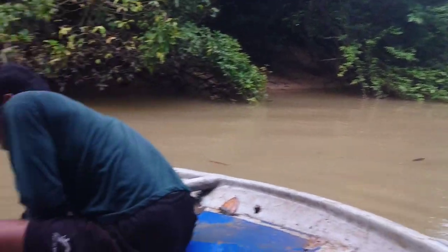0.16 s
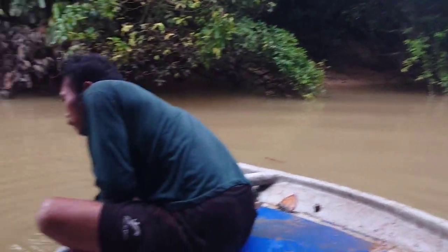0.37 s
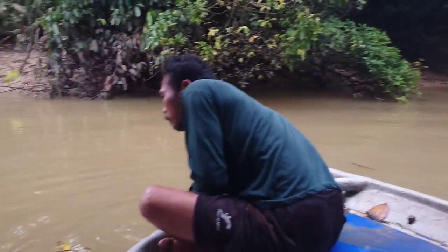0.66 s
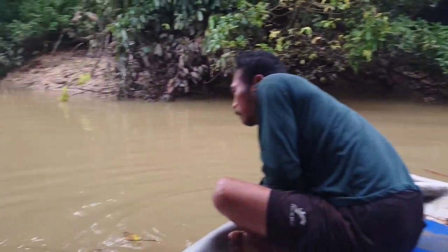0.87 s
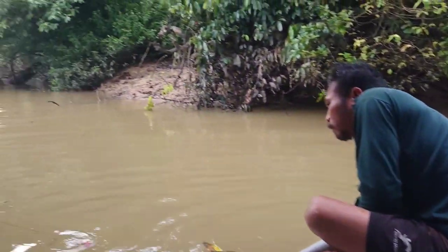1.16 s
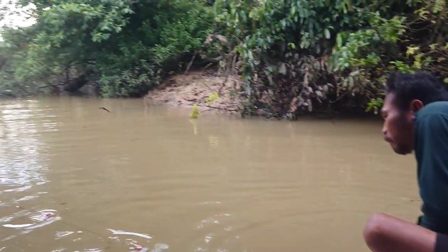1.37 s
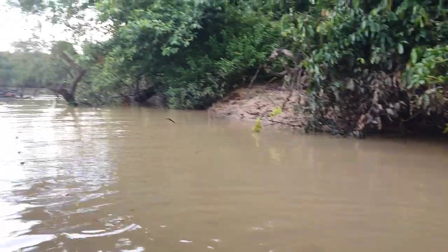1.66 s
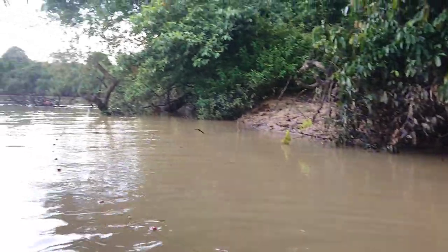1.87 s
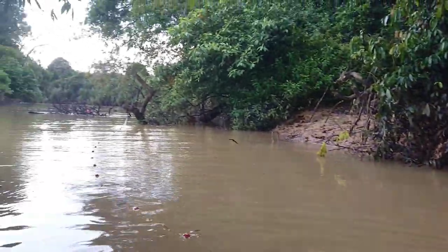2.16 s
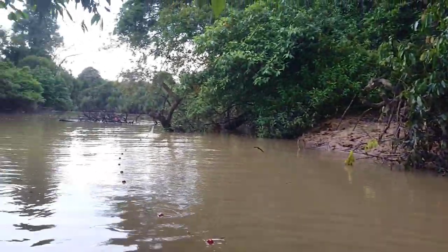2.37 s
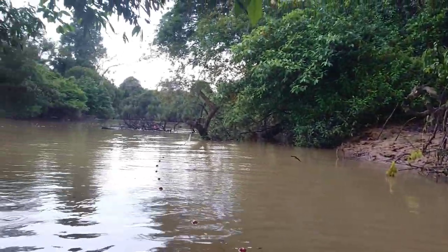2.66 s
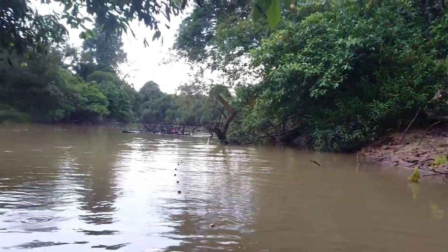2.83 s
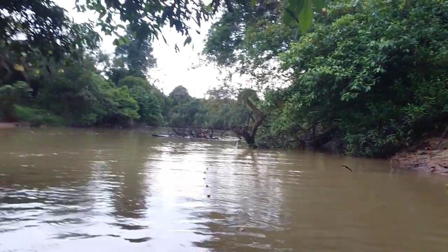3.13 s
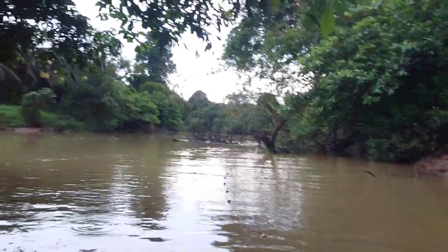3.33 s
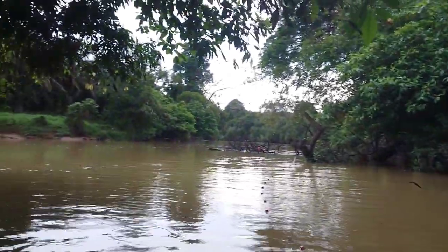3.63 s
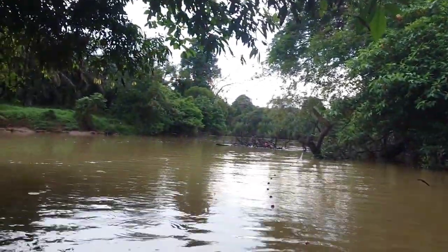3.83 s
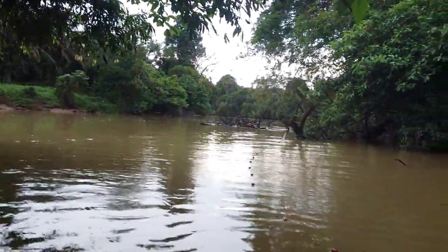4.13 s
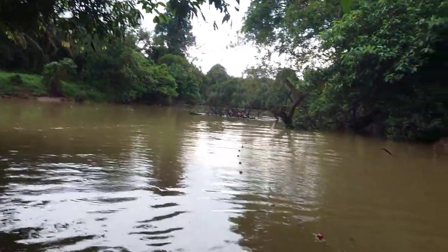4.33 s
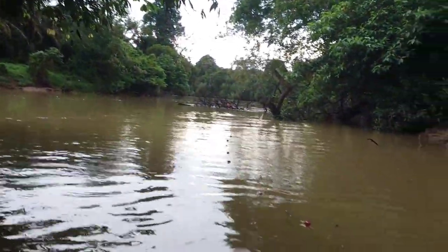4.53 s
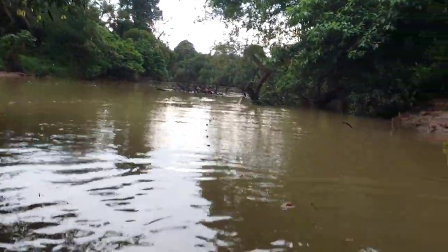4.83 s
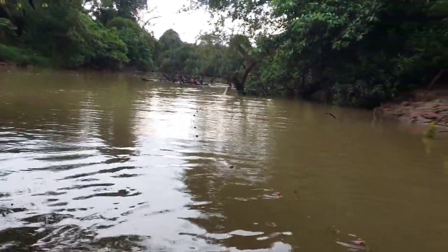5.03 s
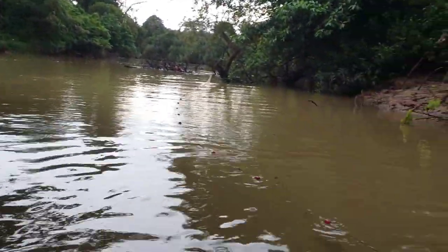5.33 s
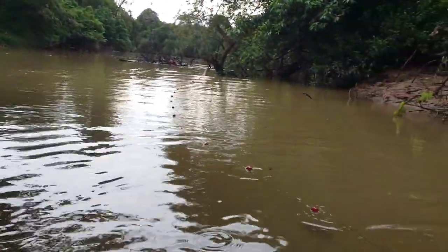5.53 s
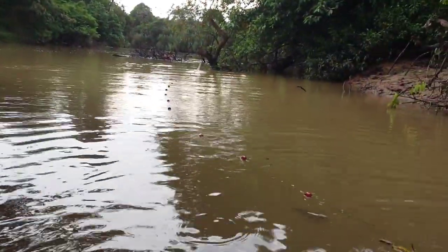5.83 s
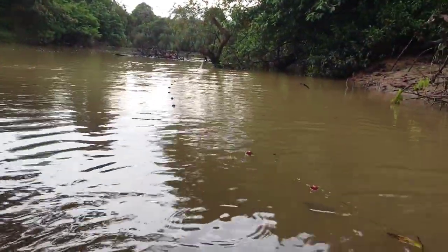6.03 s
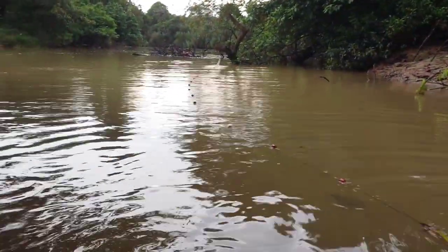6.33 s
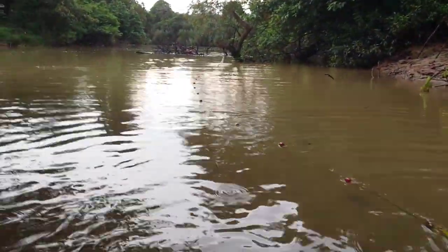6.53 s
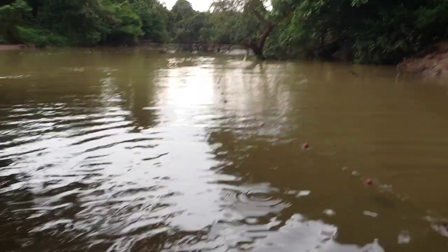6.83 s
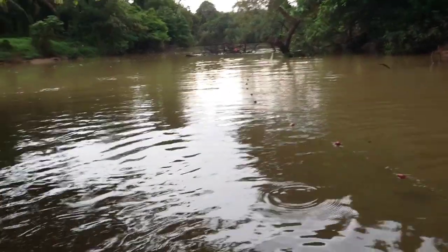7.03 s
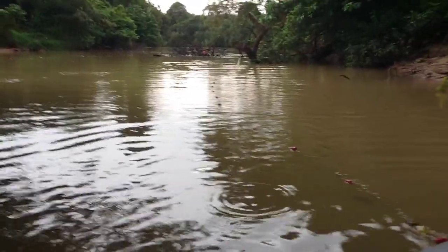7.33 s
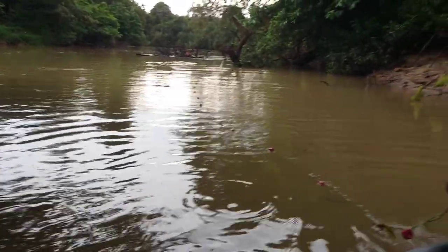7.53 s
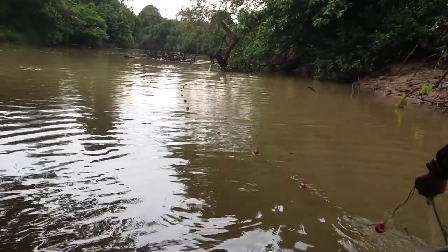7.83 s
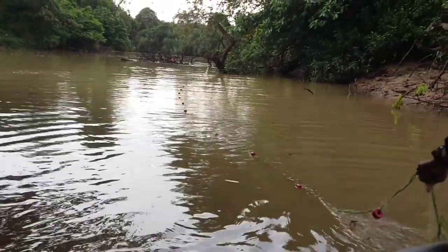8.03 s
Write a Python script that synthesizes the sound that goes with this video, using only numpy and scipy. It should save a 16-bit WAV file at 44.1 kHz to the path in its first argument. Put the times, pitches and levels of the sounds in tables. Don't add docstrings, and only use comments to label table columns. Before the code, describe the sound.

Outdoors on a calm river, heard very close from inside a small metal boat. A quiet bed of low air and water rumble, lapping, soft hiss and thin, high, pulsing insect song runs throughout. At 0 s a short scrape and tap; at 0.8 a dull, hollow hull thud with a drag, then small bumps. From 1.5 to 4.2 drops plink and bubble, with a double clack at 2.1 and a sharp, ringing knock at 3.2. A softer thump comes at 4.3, a pair of bright knocks with a cord snap at 5.3, and low bumps from 5.6 to 6.1. Light taps continue as rubbing grows from 6.6. At 7.1-7.3 the loudest event: clustered clacks, scrapes and a deep booming thump, heaviest at 7.2. Afterwards fine drips, a bubbling note near 8, low bumps and strengthening wet cord rasp until about 8.2.

```python
import sys
import numpy as np
from scipy import signal
from scipy.io import wavfile

SR = 44100
rng = np.random.default_rng(int(sys.argv[2]) if len(sys.argv) > 2 else 0)


def natural_amplitude(level_db):
    exponent = np.asarray(level_db, float) / 20
    return 10 ** exponent


def materialize(psi):
    bounded = np.clip(np.atleast_2d(psi).T, -1, 1)
    quanta = np.round(bounded * 32767).astype(np.int16)
    wavfile.write(sys.argv[1], SR, quanta)


N = 361399

PORT_LAG, HULL_LAG, RIM_LAG = 16, 8, 13


def rms_one(x):
    return x / np.sqrt(np.mean(x ** 2) + 1e-20)


def at_hz(points, hz):
    table_hz, value = np.transpose(points)
    return np.interp(np.log(hz), np.log(table_hz), value)


def drift(rate_hz):
    r = np.exp(-80 * np.pi * rate_hz / SR)
    slow = signal.lfilter([1], [1, -2 * r, r * r], rng.standard_normal(N // 40 + 2002))
    slow = rms_one(slow[2000:])
    return np.interp(np.arange(N) / 40, np.arange(len(slow)), slow).astype(np.float32)


def band_pass(noise, low_hz, high_hz):
    return signal.sosfilt(signal.butter(2, [low_hz, high_hz], "band", fs=SR, output="sos"), noise)


def add(out, sound, s, pan_db, left_lag=PORT_LAG):
    for ch, lag in enumerate((left_lag, 0)):
        at = max(round(s * SR) + lag - left_lag // 2, 0)
        part = sound[ch, :N - at]
        out[ch, at:at + len(part)] += part * natural_amplitude(pan_db / 2 * (1.5 - 2 * ch))


# f/Hz, width/Hz, level/dB, pulses/s, throb/dB
CHOIRS = [
    (6248, 340, -68, 160, -2.2),
    (6695, 240, -65, 82, 2.4),
    (8430, 300, -70, 176, -0.5),
    (8795, 380, -67, 99, 0),
    (9100, 320, -73, 210, 1),
    (12900, 1000, -72, 1000, .7),
    (14900, 2400, -65.5, 900, .7),
]


def insects():
    out, t = 0, np.arange(N) / SR
    for hz, width_hz, db, per_s, throb_db in CHOIRS:
        chirps = rng.random((2, N)) < 3.5 * per_s / SR
        pulses = rng.standard_normal((2, N)) * (0.64 + 3.4 * chirps)
        r = np.exp(-np.pi * width_hz / SR)
        poles = [1, -2 * r * np.cos(2 * np.pi * hz / SR), r * r]
        once = signal.lfilter([1, 0, -1], poles, pulses)
        song = rms_one(signal.lfilter([1, 0, -1], poles, once))
        near_singers = (-.45, .05, .4) if width_hz < 700 else ()
        for offset in near_singers:
            wing = 1 + 0.25 * np.sin(2 * np.pi * per_s * (t + 0.0034 * drift(3.3)))
            pitch_hz = hz + offset * width_hz + 14 * drift(5)
            cycles = np.cumsum(pitch_hz, dtype=float) / SR
            note = np.sin(2 * np.pi * cycles + [[0], [np.pi / 2]])
            song = song + natural_amplitude(-6 + 2.3 * drift(3.9)) * wing * note
        out = out + natural_amplitude(db + throb_db * drift(1.33)) * song
    return out


# f/Hz, likeness/0-1
LIKENESS = [(40, 0.46), (150, 0.96), (400, 0.84), (1000, 0.072), (2500, 0.16), (5000, 0.012)]


def banded_noise(spectrum, patchy_db, flicker_hz):
    low_hz, top_hz = spectrum[0][0], min(spectrum[-1][0], .45 * SR)
    edges = np.geomspace(low_hz, top_hz, int(2 * np.log2(top_hz / low_hz)) + 2)
    out, together = 0, drift(flicker_hz / 4)
    white = rng.standard_normal((2, 2, N))
    for k, (low, high) in enumerate(zip(edges, edges[1:])):
        mid, side = band_pass(white[k % 2], low, high)
        hz = np.sqrt(low * high)
        alike = np.clip(at_hz(LIKENESS, hz), 0, 1)
        flicker = natural_amplitude(patchy_db * (0.66 * together + drift(flicker_hz)))
        stereo = np.sqrt(1 + alike) * mid + np.sqrt(1 - alike) * side * [[1], [-1]]
        out = out + natural_amplitude(at_hz(spectrum, hz)) * flicker * stereo
    out[0] = np.roll(out[0], PORT_LAG)
    return rms_one(out * natural_amplitude([[-1.1], [1.1]]))


# t/s, level/dB
PULL = [(0, -70.5), (.42, -70.5), (.53, -64.5), (1.0, -65), (1.15, -69), (1.55, -71.5), (3.0, -72),
        (4.25, -73.5), (5.15, -63.5), (5.7, -71.5), (6.55, -64.5), (6.75, -57.5), (7.07, -58),
        (7.32, -51.5), (7.45, -63), (7.81, -59.5), (7.87, -53), (8.19, -49.5)]


def pull():
    return np.interp(np.arange(N) / SR, *np.transpose(PULL))


def stirred(calm_db, middling_db, follows, after_db, rise_s, dying_s):
    swell = np.full(N, 1e-18)
    for s, db, *_ in THUDS:
        swell[round(s * SR)] = natural_amplitude(db + after_db)
    rise = np.exp(-1 / (SR * max(rise_s, .002)))
    fall = np.exp(-1 / (SR * max(dying_s, .01)))
    swell = signal.lfilter([1 - rise], np.convolve([1, -rise], [1, -fall]), swell)
    return natural_amplitude(calm_db) + natural_amplitude(middling_db + follows * (pull() + 60)) + swell


# f/Hz, level/dB per Hz
RUMBLE = [(15, -55), (25, -21), (36, -8), (75, 4), (94, -2.5), (119, -14), (140, -25), (200, -15),
          (260, -30.5), (440, -120)]


def rumble():
    level = stirred(calm_db=-57, middling_db=-64, follows=1, after_db=-32.5, rise_s=0.8, dying_s=0.23)
    return level * banded_noise(RUMBLE, patchy_db=0.5, flicker_hz=13)


# f/Hz, level/dB per Hz
MURMUR = [(76, -29), (130, -2.5), (492, -7.5), (549, -2), (620, -7.5), (1430, -25.5), (1800, -12.5),
          (2340, -50), (3960, -120)]


def murmur():
    level = stirred(calm_db=-72, middling_db=-60, follows=1.64, after_db=-30.5, rise_s=2.2, dying_s=0.018)
    return level * banded_noise(MURMUR, patchy_db=2.8, flicker_hz=9)


# f/Hz, level/dB per Hz
RUB = [(590, -14), (1000, -5.5), (1730, -12), (2500, -6), (3830, -7), (4810, -5.5), (6790, -10.5),
       (7880, -13), (8840, -14), (15500, -20.5)]


def rub():
    cord = natural_amplitude(5.0) * banded_noise(RUB, patchy_db=1.97, flicker_hz=55)
    spray = signal.sosfilt(signal.butter(2, 9500, "high", fs=SR, output="sos"), cord)
    level = stirred(calm_db=-90, middling_db=-60, follows=1, after_db=-37.5, rise_s=0, dying_s=0.024)
    return level * cord + 2 * natural_amplitude(pull() - 9) * spray


# f/Hz, level/dB per Hz
AIR = [(120, 5), (300, -9), (600, -17), (1200, -17), (2500, -21), (4500, -22.5), (6500, -13.5), (9000, -17),
       (12000, -32.5), (15500, -28)]


def air():
    return natural_amplitude(-61) * banded_noise(AIR, patchy_db=1.6, flicker_hz=8)


# f/Hz, level/dB, t60/s
HULL = [(58.5, -2, 0.35), (84, 13, 0.088), (120, 2, 0.76), (152.7, 0.5, 0.83), (195.7, -1, 0.56),
        (228.2, 4, 0.27), (251, -23, 0.29), (298, 2, 0.33), (340.7, 0, 0.35), (413, -2.5, 0.36),
        (465.3, -0.5, 0.18), (516, -2, 0.25), (564.7, -5, 0.34), (640.4, -4, 0.19), (750, -4, 0.22),
        (872, 5, 0.078), (1019, -3, 0.18), (1166, 8, 0.056), (1406, 1.5, 0.076), (1640, 0.5, 0.12),
        (1744, -4, 0.067), (1950, -11, 0.23), (2204, 4.5, 0.057), (2180, -40, 0.061), (3000, -34, 0.01),
        (2872, 0, 0.047), (3750, -33, .08), (3580, -49, 0.073), (4500, -55, .06), (5500, -20, .05)]
BLOW_S = .22


def struck_hull(centre, spread, ring, contact_s):
    hz, level_db, t60 = np.tile(np.transpose(HULL), 2)[:, :, None]
    place, turn, apart = rng.standard_normal((3, 2 * len(HULL), 1))
    t = np.arange(round(BLOW_S * SR), dtype=np.float32) / np.float32(SR)
    hz = hz * (1 + turn * np.repeat([.015, .07], len(HULL))[:, None])
    away = (np.log2(hz / 100) - centre) / max(spread, .15)
    gain = natural_amplitude(level_db - 2.8 * away ** 2 + 2 * place)
    fall = np.log(1000) / (t60 * np.clip(ring, .1, 1.5))
    twist = apart * np.clip(hz / 3500, .06, 1.5)
    heard = away[:, 0] ** 2 < 6
    parts = (gain, fall, hz, twist, place)
    gain, fall, hz, twist, place = [v[heard].astype(np.float32) for v in parts]
    build_up = 1 - np.exp(-t / (max(contact_s, 2e-4) + 0.14 / hz))
    shape = gain * np.exp(-fall * t) * build_up
    phase = 2 * np.pi * (hz * t + 0.13 * place)
    both = np.array([np.sum(shape * np.sin(phase + side * twist), 0) for side in (1, -1)])
    fade = np.minimum(1, (len(t) - np.arange(len(t))) / 2000)
    return both * fade / np.max(np.abs(both))


# t/s, level/dB, centre/octaves over 100 Hz, length/s
DRAGS = [(0.005, -40, 2.2, 0.044), (.47, -54, 4.9, 0.11), (.835, -31, 1.98, 0.047), (.875, -37, 2.0, 0.052),
         (.97, -57, 4.8, .07), (1.305, -47, 2.9, 0.067), (1.797, -50, 3.4, .008), (3.214, -37, 4, .06),
         (3.225, -40, 2.4, .09), (3.343, -54, 4.9, .02), (5.264, -38, 2.8, 0.024), (5.305, -43, 3.1, 0.058),
         (5.622, -39, 2.23, 0.046), (5.86, -48, 2.5, 0.066), (5.91, -39.5, 2.75, 0.034),
         (5.912, -44.5, 4.5, .02), (6.055, -51, 2.7, .05), (6.105, -49, 2.9, .04), (7.1, -32.5, 3.5, 0.06),
         (7.108, -38, 4.7, 0.047), (7.205, -32, 4.6, 0.058), (7.265, -32.5, 3.4, 0.065),
         (7.33, -41, 2.3, .04), (7.41, -47, 3.2, .03), (7.84, -46, 2.3, .04), (7.89, -46, 1.8, .05),
         (8.038, -41, 3, .05), (8.13, -38, 2.7, 0.057)]


def drags():
    out, t = np.zeros((2, N)), np.arange(round(.15 * SR)) / SR
    slips_per_s = 1100
    for s, db, centre, length_s in DRAGS:
        when, size = rng.random((2, len(t)))
        push = np.sin(np.pi * np.clip(t / max(length_s, .005), 0, 1) ** 0.55)
        slipping = np.tanh(np.maximum(slips_per_s / SR - when, 0) * SR / 40)
        slips = slipping * (2 * size - 1) * push
        plates = struck_hull(centre, spread=.45, ring=.36, contact_s=0.00065)
        sound = signal.fftconvolve(plates, slips[None], axes=1)
        add(out, natural_amplitude(db) * sound / (np.max(np.abs(sound)) + 1e-9), s, -2.4, RIM_LAG)
    return out


def scuff(noise, low_hz, top_hz, crack_db, tail_db, tail_s):
    t = np.arange(noise.shape[1]) / SR
    rustle = rms_one(band_pass(noise, low_hz, np.clip(top_hz, 2 * low_hz, 12000)))
    crack = natural_amplitude(crack_db) * np.exp(-t / 0.0026)
    tail = natural_amplitude(tail_db) * np.exp(-t / max(tail_s, .003))
    return rustle * (crack + tail)


def blow_width(octaves, per_db, db):
    return octaves - per_db * (db + 30)


# t/s, level/dB, centre/octaves over 100 Hz, ring/factor, L-R/dB
KNOCKS = [(0.009, -30.5, 2.48, 0.61, -4.5), (0.026, -37, 2.4, 0.76, -1.5), (2.104, -33.5, 3.3, 0.58, -6),
          (3.212, -17, 3.8, 0.62, -0.5), (4.276, -33, 2.6, 0.54, 0.5), (4.395, -40.5, 2.8, 0.97, -2),
          (5.262, -25.5, 3.18, 0.61, -0.5), (5.296, -26, 4.36, 0.8, 0.5), (5.912, -39, 2.6, 0.87, -2),
          (6.11, -45, 2.8, 0.88, -0.5), (6.727, -30, 4.16, 0.48, -1.5), (6.935, -38.5, 2.7, 0.98, 0.5),
          (7.196, -12, 2.28, 0.6, -5), (7.308, -37, 5.7, 0.9, 0)]
CLACKS = [(0.829, -39, 3.5, 1, -5), (1.976, -50, 2.9, 0.55, -2), (1.953, -36.5, 3.77, 0.57, -9),
          (2.1047, -28.5, 3.93, 0.92, 3), (6.27, -43.5, 3.5, 0.68, -2), (6.4487, -32, 3.3, 0.65, -20),
          (7.0857, -20, 3.6, 0.4, -2), (7.0937, -21, 3.33, 0.72, -5), (7.197, -20.5, 4.7, 1, -12.5),
          (7.236, -26.5, 3.9, 1, 0), (7.2559, -20, 3.36, 0.63, -5), (7.2638, -33, 4.5, 0.99, 1),
          (7.3177, -36, 7, 0.8, -6), (7.406, -33, 3.36, 0.58, -2)]


def knocks():
    out = np.zeros((2, N))
    for rows, octaves, per_db in ((KNOCKS, 1.25, 0.015), (CLACKS, 0.72, 0.02)):
        for s, db, centre, ring, pan_db in rows:
            spread = blow_width(octaves, per_db, db)
            noise = rng.standard_normal((2, round(BLOW_S * SR)))
            top_hz = 100 * 2 ** (centre + 1.27 * spread)
            contact = scuff(noise, 540, top_hz, -11.5, -19, 0.026 * ring)
            plates = struck_hull(centre, spread, ring, contact_s=0.00083)
            add(out, natural_amplitude(db) * (plates + contact), s, pan_db, RIM_LAG)
    return out


# t/s, level/dB, f/Hz, swell/s
BOOMS = [(.831, -35, 520, .004), (.85, -36, 226, .008), (.885, -39, 420, .006), (5.62, -41, 460, .004),
         (5.622, -45, 620, .004), (5.64, -45, 330, .006), (7.102, -26, 410, .004), (7.178, -25, 350, .005),
         (7.3, -34, 410, .008), (7.21, -27, 148, .01), (7.12, -34, 1080, .02), (.985, -56, 2000, .02),
         (6.06, -50, 700, .008), (5.49, -52, 300, .015), (.83, -32.5, 355, .005), (.831, -31, 225.7, .005),
         (3.217, -36, 334, 0.0047), (7.6, -38, 224.5, 0.016), (8.074, -38, 200, .01),
         (8.115, -36, 190, 0.013), (8.155, -34.5, 215, .01), (.705, -46, 69.6, .01),
         (.86, -34.5, 83.8, 0.033), (.975, -35.5, 87, 0.011), (1.33, -49, 354, 0.016),
         (2.111, -47.5, 149.6, 0.012), (3.221, -34.5, 143, 0.011), (3.589, -46.5, 258.6, 0.015),
         (4.282, -38.5, 157, 0.0099), (5.621, -40, 167, 0.0067), (5.689, -39, 213, 0.042),
         (5.789, -50, 207, 0.016), (5.868, -42, 123.6, 0.02), (5.93, -49.5, 241, 0.012),
         (6.061, -47, 236, 0.025), (6.62, -43.5, 124, 0.047), (7.009, -45, 225, 0.022),
         (7.085, -35, 161, 0.0066), (7.111, -23.5, 82.3, 0.035), (7.131, -43, 217, 0.031),
         (7.16, -19.5, 227.2, 0.014), (7.192, -23, 76.4, 0.016), (7.301, -31.5, 224.5, 0.041),
         (7.371, -38, 91.5, 0.027), (7.41, -39.5, 230.4, 0.0074), (7.545, -31.5, 225.3, 0.027),
         (7.703, -42.5, 120, 0.041), (7.771, -43, 91, 0.041), (8.06, -32, 116, 0.028),
         (8.11, -26.5, 97.4, 0.052), (8.157, -27, 101, 0.015)]
# t/s, level/dB, f/Hz
RIM_NOTES = [(1.951, -43, 1495), (3.212, -29.5, 863), (3.213, -28.5, 1440), (3.215, -34, 764),
             (3.214, -37, 1023), (3.213, -33, 1900), (7.086, -25, 1000), (7.087, -31, 2250),
             (7.097, -27, 1180), (5.914, -47, 2300), (5.913, -46, 1000), (7.407, -45, 2200),
             (7.408, -44, 900), (.832, -47, 1950), (.84, -48, 1410), (7.24, -34, 1500), (5.265, -41, 1100),
             (.53, -56, 2700), (4.278, -38, 820), (5.297, -40, 1300), (6.274, -44, 1940),
             (6.446, -41, 1590), (7.092, -23.5, 1097), (7.200, -20, 2206), (7.256, -27.5, 1020)]
# f/Hz, t60/s
PLATE_T60 = [(80, 0.27), (220, 0.23), (355, 0.12), (1500, 0.062)]


def booms():
    out, t = np.zeros((2, N)), np.arange(round(.4 * SR)) / SR
    rim_swell_s = 0.0015
    for s, db, hz, swell_s in BOOMS + [(*note, rim_swell_s) for note in RIM_NOTES]:
        t60 = max(at_hz(PLATE_T60, hz), .03)
        swell = np.sin(np.pi / 2 * np.minimum(t / max(swell_s, .003), 1)) ** 2
        dying = np.exp(-np.log(1000) * np.maximum(t - swell_s, 0) / t60)
        tone = np.sin(2 * np.pi * hz * t) * swell * dying
        add(out, natural_amplitude(db) * np.array([tone, tone]), s, -2.8, HULL_LAG)
    return out


# t/s, level/dB, centre/octaves over 100 Hz, ring/factor
THUDS = [(0.83, -29, 1.75, 0.75), (0.86, -33, 1.5, 0.8), (0.909, -62, 1.9, 0.36), (1.312, -50, 2.1, 1),
         (1.977, -48, 1.8, 0.25), (4.284, -33, 1.9, 0.66), (4.56, -48, 1, 0.54), (5.319, -37.5, 2.7, 0.58),
         (5.336, -42, 2.5, 0.62), (5.62, -36, 1.3, 0.42), (5.649, -38, 1.3, 0.82), (6.07, -43.5, 1.54, 1),
         (6.391, -43, 2.2, 1), (6.588, -42, 1.26, 0.99), (6.842, -44, 2.3, 0.29), (7.101, -15, 1.56, 0.25),
         (7.116, -23, 1.1, 0.59), (7.129, -25, 1.26, 0.71), (7.175, -15, 1.54, 0.38),
         (7.211, -16.5, 2.4, 0.26), (7.222, -29, 2.9, 0.17), (7.288, -24, 1.4, 0.89),
         (7.701, -37, 1.26, 0.77), (7.92, -40, 1.6, 0.49), (8.078, -35.5, 1.9, 1),
         (8.167, -31.5, 2.77, 0.28)]


def thuds():
    out = np.zeros((2, N))
    for s, db, centre, ring in THUDS:
        spread = blow_width(0.68, 0.017, db)
        noise = rng.standard_normal((1, round(BLOW_S * SR)))
        top_hz = 100 * 2 ** (centre + 1.63 * spread)
        contact = scuff(noise, 180, top_hz, -42, -14.5, 0.045 * ring)
        plates = struck_hull(centre, spread, ring, contact_s=0.0022)
        add(out, natural_amplitude(db) * (plates + contact), s, -2.5, HULL_LAG)
    return out


# t/s, level/dB, f/Hz, t60/s
DRIPS = [(1.53, -49, 1630, 0.055), (1.671, -51, 1240, 0.045), (1.798, -43, 424, 0.017),
         (2.041, -58, 447, 0.085), (2.313, -40, 530, 0.024), (2.434, -52, 830, 0.045),
         (2.474, -37, 1135, 0.067), (2.528, -50, 790, 0.045), (2.765, -49, 667, 0.077),
         (2.913, -45, 450, 0.055), (3.056, -44.5, 417, 0.039), (3.164, -36.5, 600, 0.016),
         (3.627, -41.5, 590, 0.027), (3.669, -37, 1460, 0.06), (3.689, -41.5, 1130, 0.045),
         (3.736, -52, 760, 0.038), (3.803, -49.5, 1490, 0.087), (4.179, -46.5, 750, 0.03),
         (4.225, -37.5, 380, 0.017)]
# t/s, level/dB, f/Hz
SPATTER = [(1.76, -51.5, 3170), (2.4369, -55, 2330), (2.765, -43, 1150), (3.6644, -58, 1460),
           (3.7763, -57, 2780), (3.8194, -56, 2840), (4.6319, -53.5, 2600), (4.9794, -46, 1960),
           (5.0994, -49.5, 2410), (7.66, -46.5, 2310), (7.6904, -46, 2040)]
# t/s, level/dB, f/Hz, t60/s, rise/octaves per s
GLUGS = [
    (3.485, -56.5, 467, 0.68, 4.4),
    (3.97, -61, 467, 0.24, 1.7),
    (7.96, -46.5, 548, 0.82, 0.16),
]


def drips():
    rise, spatter_t60 = 1.5, 0.027
    drops = [(*d, rise) for d in DRIPS] + [(*d, spatter_t60, rise) for d in SPATTER] + GLUGS
    out, t = np.zeros((2, N)), np.arange(round(.3 * SR)) / SR
    for s, db, hz, t60, climb in drops:
        phase = 2 * np.pi * np.cumsum(hz * 2 ** (climb * t)) / SR
        onset = 1 - np.exp(-t * hz / 1.66)
        bubble = np.sin(phase) * np.exp(-np.log(1000) * t / max(t60, .01)) * onset
        bubble = bubble * (1 + 0.19 * np.cos(2 * np.pi * 24 * t))
        noise = rng.standard_normal((1, len(t)))
        slap = scuff(noise, 0.37 * hz, 1.24 * hz, -18.0, -21.5, 0.011)[0]
        add(out, natural_amplitude(db + 1.0) * np.array([bubble + slap] * 2), s, -2.2)
    return out


# t/s, level/dB
TICKS = [
    (1.7964, -55),
    (1.9714, -55),
    (3.723, -50),
    (4.0823, -53),
    (5.0894, -51),
    (5.297, -37.5),
    (6.7246, -59),
    (7.1174, -59),
    (7.199, -37),
    (7.7628, -45),
]


def ticks():
    out, t = np.zeros((2, N)), np.arange(round(.03 * SR)) / SR
    for s, db in TICKS:
        bright = np.diff(rng.standard_normal((2, len(t) + 1)))
        add(out, natural_amplitude(db) * bright * np.exp(-t / 0.0072), s, -1.2)
    return out


def scene():
    background = insects() + rumble() + murmur() + rub() + air()
    hull = drags() + knocks() + booms() + thuds()
    return background + hull + drips() + ticks()


def roll_off(x):
    return signal.sosfilt(signal.butter(12, 16770, fs=SR, output="sos"), x)


# f/Hz, width/Hz, depth/0-1
PORT_DIPS = [
    (5360, 700, 0.4),
    (7640, 620, 0.73),
    (9000, 220, 0),
]


def record(dry):
    mix = signal.sosfilt(signal.butter(4, 37, "high", fs=SR, output="sos"), dry)
    mix = signal.sosfilt(signal.ellip(12, .5, 70, 15600, fs=SR, output="sos"), mix)
    for hz, width_hz, depth in PORT_DIPS:
        peak = signal.lfilter(*signal.iirpeak(hz, hz / width_hz, fs=SR), mix)
        mix = mix - np.clip(depth, 0, 1) * peak
    return roll_off(mix)


dry = scene()
out = record(dry)
materialize(out)
```